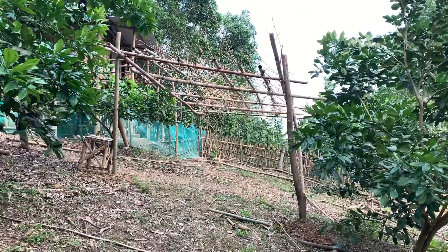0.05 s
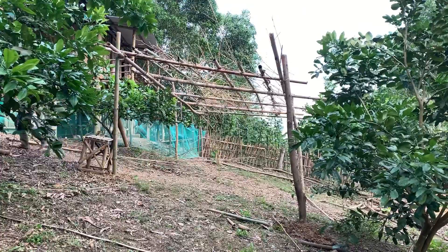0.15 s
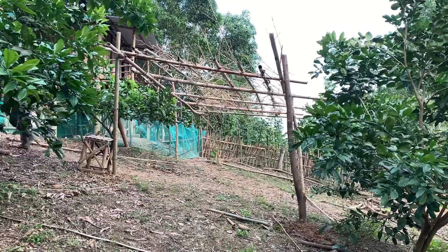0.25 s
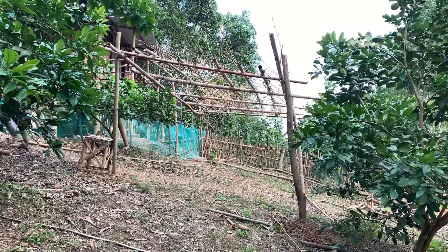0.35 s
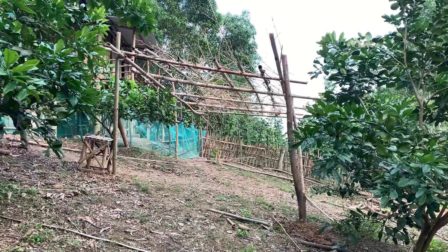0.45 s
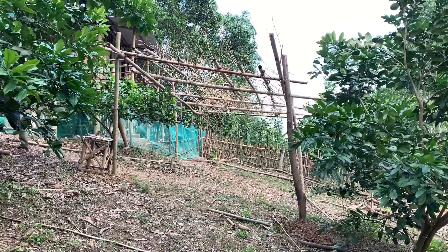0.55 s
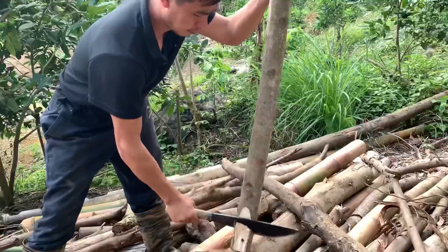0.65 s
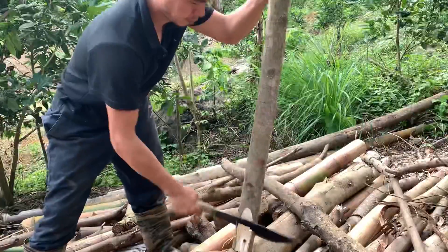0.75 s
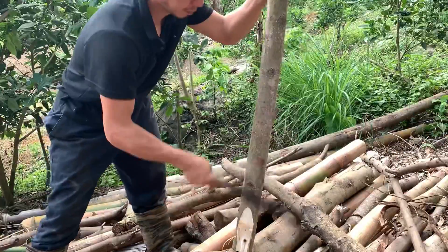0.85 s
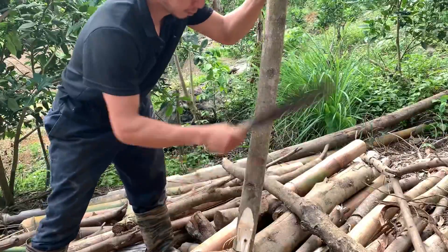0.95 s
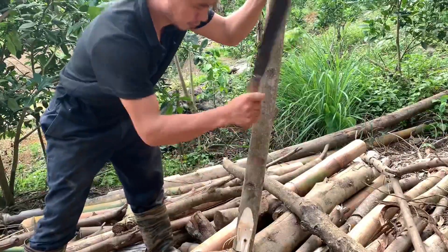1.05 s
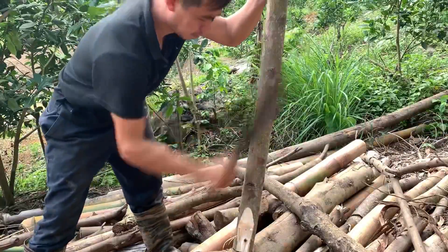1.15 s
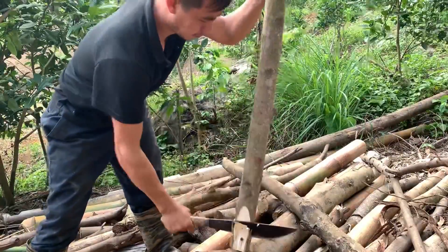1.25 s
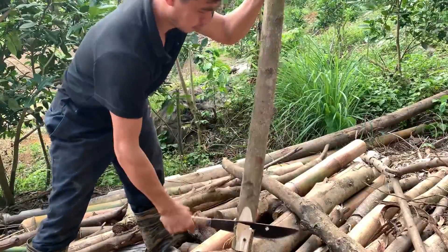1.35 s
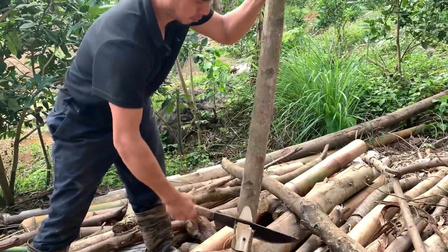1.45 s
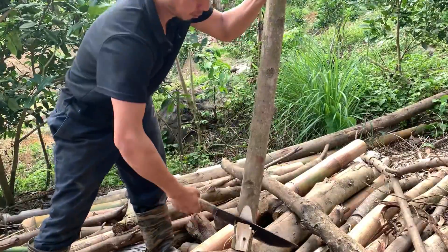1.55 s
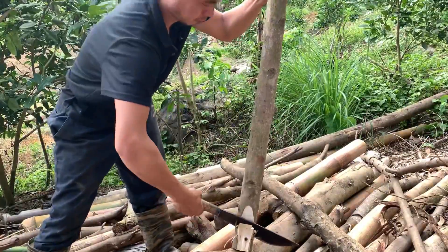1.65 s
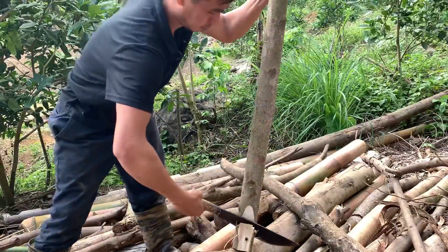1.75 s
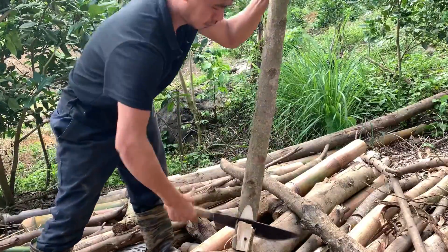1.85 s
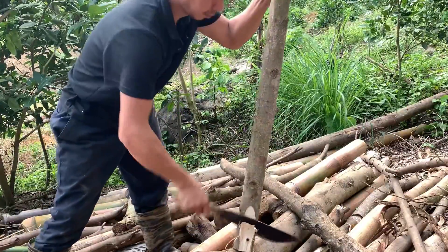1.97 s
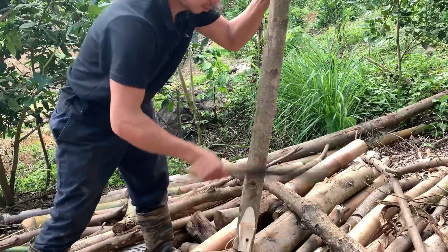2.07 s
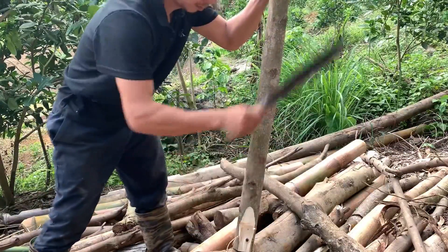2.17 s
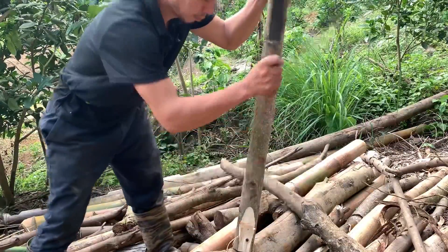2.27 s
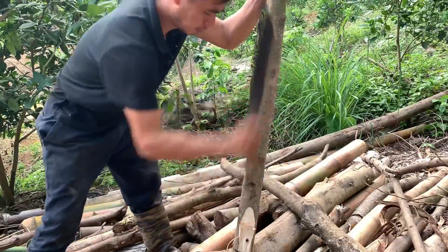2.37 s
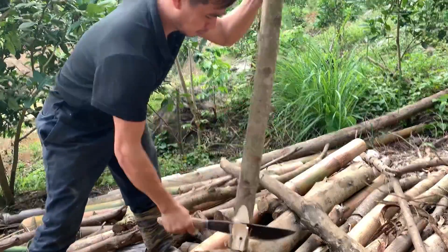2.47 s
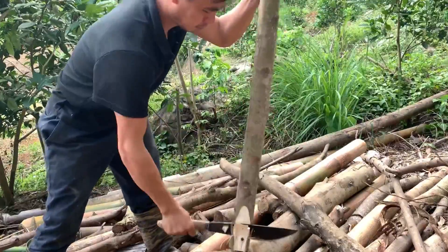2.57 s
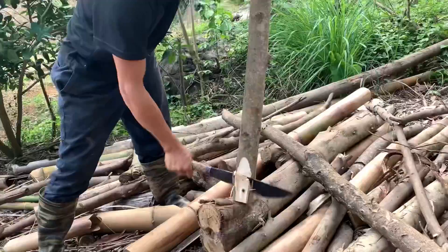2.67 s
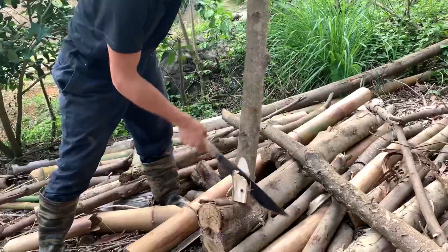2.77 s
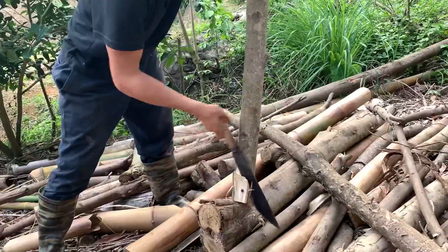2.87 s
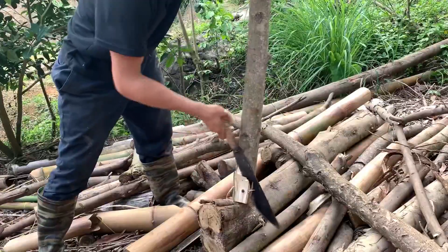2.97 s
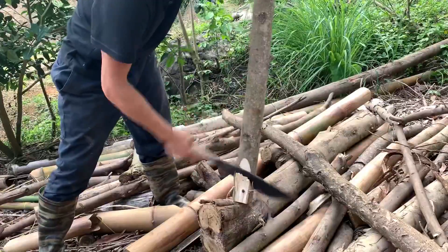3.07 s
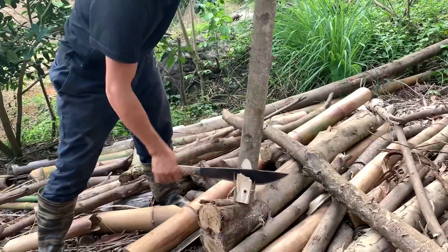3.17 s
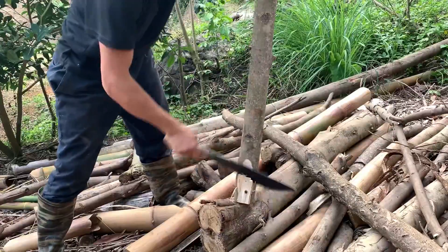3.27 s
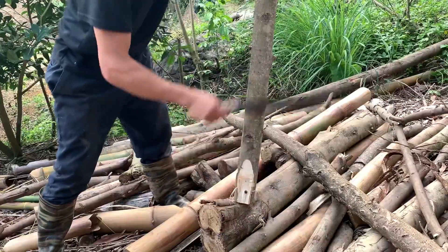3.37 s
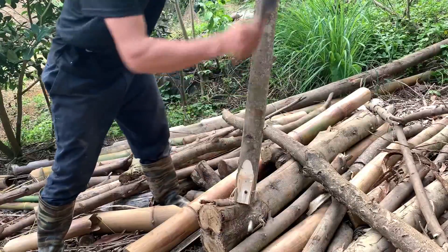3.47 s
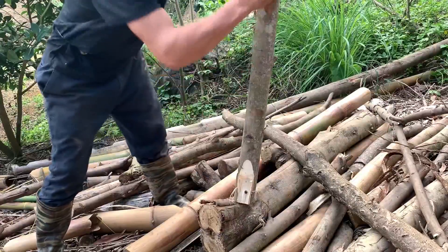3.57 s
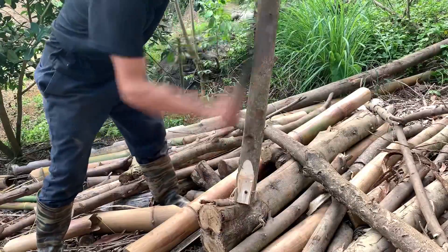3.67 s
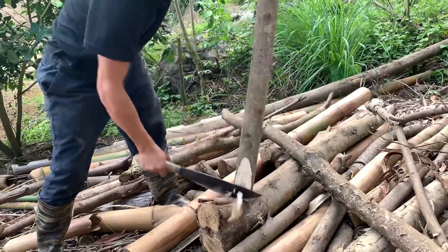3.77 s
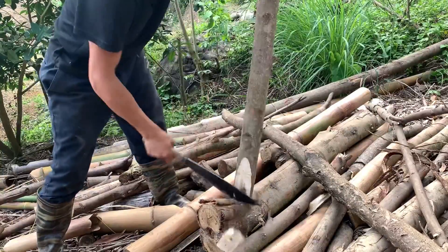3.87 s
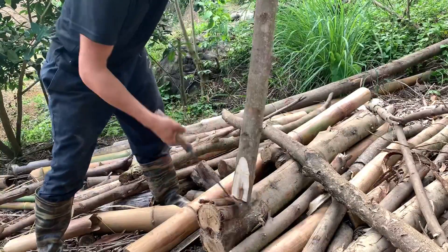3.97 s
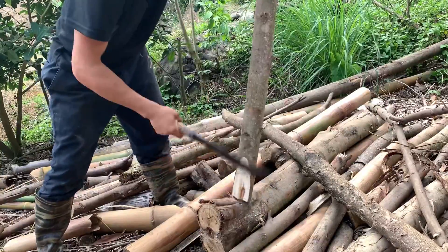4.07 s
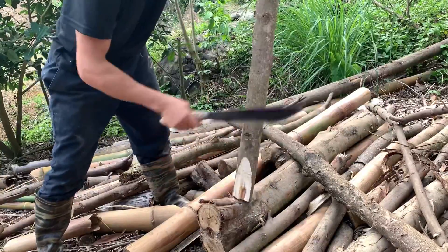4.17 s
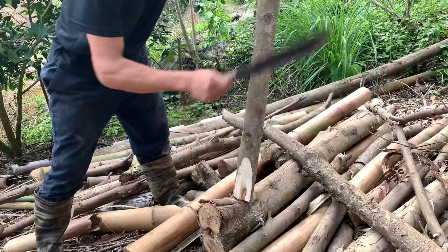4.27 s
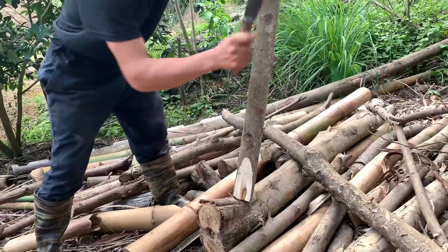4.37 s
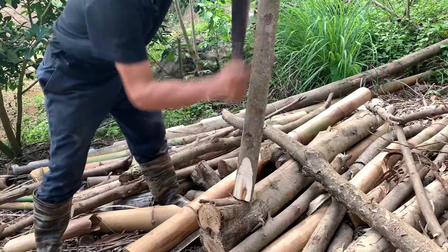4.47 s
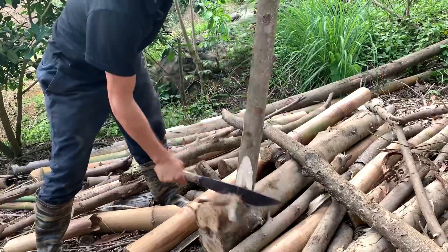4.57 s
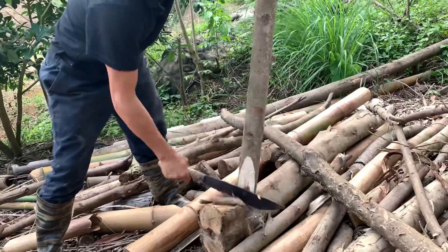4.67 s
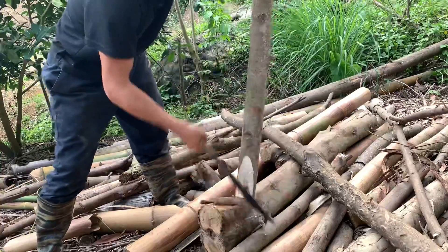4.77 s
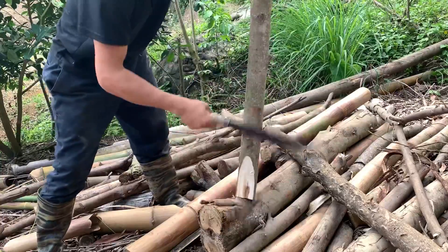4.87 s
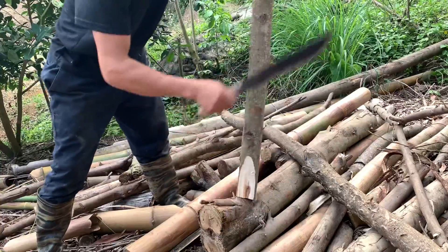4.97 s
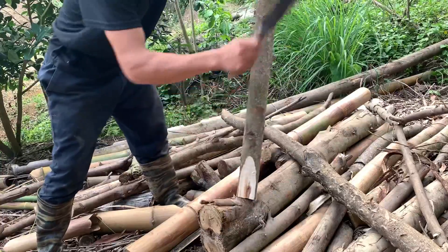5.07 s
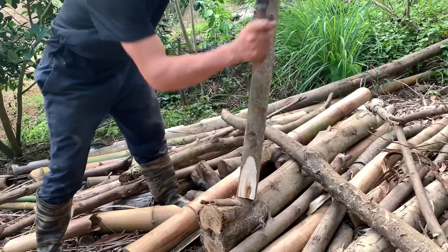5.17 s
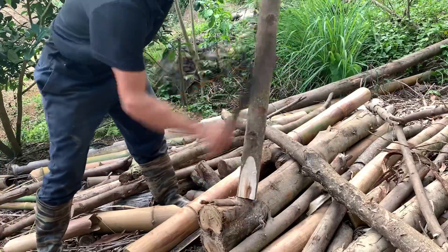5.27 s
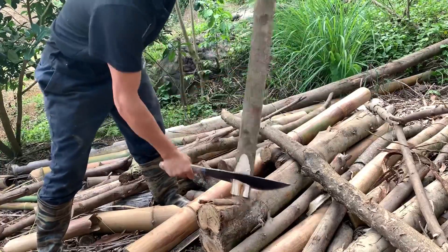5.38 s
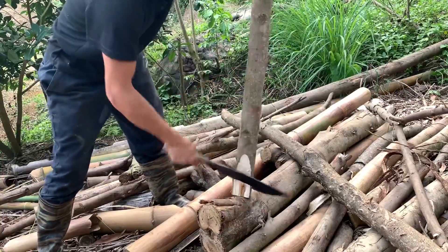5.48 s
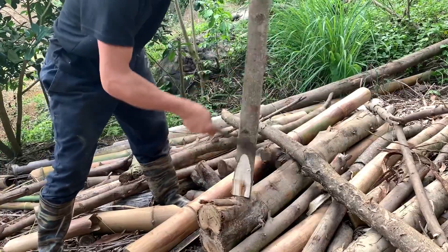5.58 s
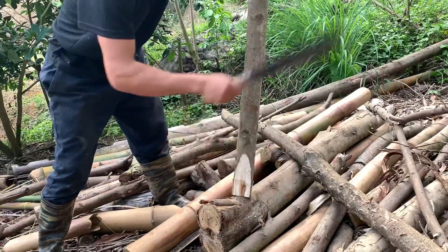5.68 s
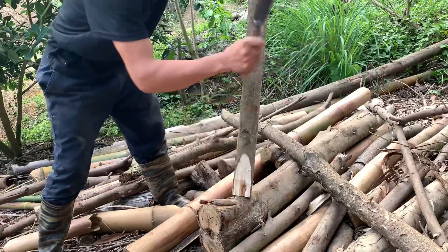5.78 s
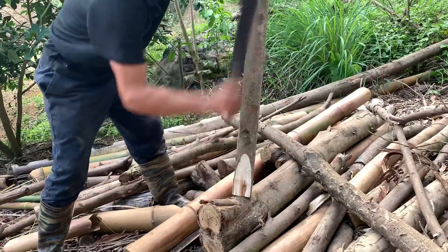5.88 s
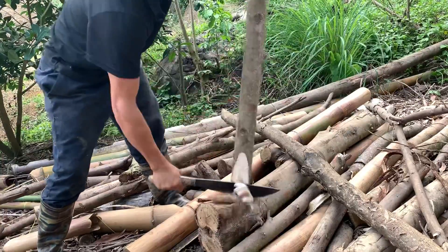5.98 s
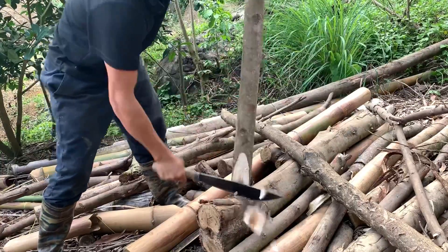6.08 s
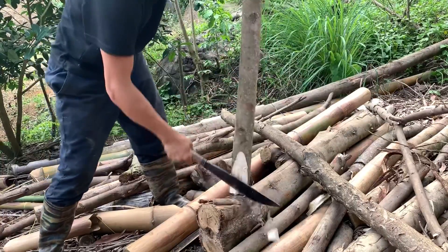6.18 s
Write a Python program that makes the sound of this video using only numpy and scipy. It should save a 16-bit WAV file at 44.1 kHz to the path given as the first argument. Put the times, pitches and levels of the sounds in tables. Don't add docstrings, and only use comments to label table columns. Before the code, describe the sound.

Faint hen clucks over distant insects, then a long blade chops a wooden pole outdoors in hard, cracking, splintering blows while wind rumbles.

```python
import sys
import numpy as np
from scipy import signal
from scipy.fft import rfft, irfft, next_fast_len
from scipy.io import wavfile

SR = 44100
rng = np.random.default_rng(int(sys.argv[2]) if len(sys.argv) > 2 else 0)


def log_audio(samples):
    frames = np.atleast_2d(samples).T
    limited = np.clip(frames, -1, 1)
    pcm = np.round(limited * 32767).astype(np.int16)
    wavfile.write(sys.argv[1], SR, pcm)


def boost_factor(decibels):
    exponent = np.asarray(decibels, float) / 20
    return 10 ** exponent


N = 274743

CUTS_S = (.5885, 2.668)
# [peak t/s, level/dB, top re level/dB, rise/s, decay/s]
TEARS = [(.6245, -13, 8, 0.0084, 0.016), (1.2071, -14, -8, 0.00067, 0.015), (1.212, -10, 6.5, 0.011, 0.01),
         (2.443, -17, 4, 0.0014, 0.037), (2.4505, -15.5, 5.5, 0.031, 0.014), (3.735, -17, 8, 0.0071, 0.025),
         (3.7404, -12, 7, 0.025, 0.028), (3.752, -32, 8, .006, 0.015), (4.5747, -7, 10.5, 0.0019, 0.026),
         (4.5867, -10.5, 3.5, 0.01, 0.022), (4.599, -23, -4, 0.0065, 0.019), (5.3375, -7, 8, 0.0045, 0.018),
         (5.3405, -17, -13, 0.026, 0.0062), (5.9795, -11, 11, 0.0038, 0.03),
         (5.9879, -10, 3, 0.024, 0.0098)]
# [low f/Hz, high f/Hz, level/dB, share of level swing, share of flutter swing]
WIND_BANDS = [(41.2, 109.2, -34.5, 1.006, -0.53), (104.5, 168, -37, 1.18, 0.36),
              (148.6, 246.4, -40, 1.06, 0.62), (233.4, 409, -46.5, 0.91, 0.62)]


def at_hz(points, hz, column=1):
    points = np.array(points)
    return np.interp(np.log(hz), np.log(points[:, 0]), points[:, column])


def in_time(rows):
    s, *columns = np.transpose(rows)
    return [np.interp(np.arange(N) / SR, s, c) for c in columns]


def rms_one(x):
    return x / np.sqrt(np.mean(x ** 2) + 1e-20)


def band(x, low_hz, high_hz, order=2):
    sos = signal.butter(order, [low_hz, min(high_hz, .45 * SR)], "band", fs=SR, output="sos")
    return signal.sosfilt(sos, x)


def drift(rate_hz):
    r = np.exp(-40 * np.pi * rate_hz / SR)
    slow = signal.lfilter([1], [1, -2 * r, r * r], rng.standard_normal(N // 20 + 2002))[2000:]
    return np.interp(np.arange(N) / 20, np.arange(len(slow)), rms_one(slow))


def ring(push, hz, t60_s):
    r, w = boost_factor(-60 / (t60_s * SR)), 2 * np.pi * hz / SR
    return signal.lfilter([0, np.sin(w)], [1, -2 * r * np.cos(w), r * r], push)


def add(out, s, piece):
    i = round(s * SR)
    out[i:i + len(piece)] += piece[:N - i]


def colour(x, gain):
    size = next_fast_len(len(x) + 512)
    hz = np.maximum(np.arange(size // 2 + 1) * SR / size, 1)
    return irfft(rfft(x, size) * gain(hz), size)[:len(x)]


def tears():
    # [f/Hz, level/dB per Hz]
    tear_colour = [(250, -22), (800, 1.5), (2000, -4), (4000, -4), (7000, -11.5), (10000, -10.5),
                   (14000, -5.5), (16000, -19), (17000, -85.5)]
    last_shot_top_db, last_shot_top_hz = -10, 11500
    lead_s = .025
    out, t = np.zeros(N), np.arange(int(.1 * SR)) / SR - lead_s
    for s, tear_db, top_db, rise_s, decay_s in TEARS:
        fibres = rng.standard_normal(len(t)) * boost_factor(2.2 * rng.exponential(1, len(t)))
        swell = np.where(t < 0, boost_factor(60 * t / rise_s), boost_factor(-60 * t / decay_s))
        graze = boost_factor(-24.0 + 1940 * t) * (t < 0) * rms_one(band(fibres, 1460, 9200))

        def shape(hz):
            top = top_db * np.clip(np.log2(hz / 5500) * 1.5, 0, 1)
            shade = last_shot_top_db * (s > CUTS_S[1]) * np.clip(4 * np.log2(hz / last_shot_top_hz), 0, 1)
            return boost_factor(at_hz(tear_colour, hz) + top + shade)
        add(out, s - lead_s, boost_factor(tear_db) * (graze + swell * rms_one(colour(fibres, shape))))
    return out


def blows():
    # [f/Hz, level/dB, t60/s]
    pole_modes = [(171, -36, 0.061), (230, -19, 0.082), (282, 5, 0.26), (347, 4.5, 0.087),
                  (385, -2.5, 0.021), (398.6, -4, 0.26), (487, -16, 0.13), (563, 4.5, 0.16),
                  (655, -1.5, 0.06), (770, -10, 0.091), (831, 6, 0.093), (923, -1, 0.063), (1047, 6, 0.082),
                  (1270, 5, 0.01), (1400, 1, 0.038), (1500, -21.5, 0.038), (1804, 6.5, 0.05),
                  (2020, 4.5, 0.068), (2220, 2.5, 0.014), (2620, -42, 0.0087), (2630, 6, 0.015),
                  (2960, -26, 0.022)]
    # [t/s, level/dB, centre f/Hz, width/octaves, ring factor]
    knocks = [(0.6219, -21.5, 1400, 0.19, 0.46), (.627, -21, 1500, 0.59, 0.86),
              (.630, -22, 490, 0.75, 0.72), (1.2094, -14.5, 1310, 0.54, 0.6),
              (1.215, -10, 1450, 0.99, 0.76), (1.217, -10.5, 795, 0.72, 0.23), (1.216, -17, 280, 1, 0.68),
              (2.443, -35, 1020, 0.84, 0.36), (2.452, -14, 1180, 0.93, 0.24), (2.452, -21.5, 600, 0.6, 1.2),
              (2.452, -17, 290, 0.59, 0.4), (3.735, -5.5, 1500, 0.74, 0.45), (3.744, -14, 700, 0.62, 0.8),
              (4.083, -29.5, 760, 0.12, 0.88), (4.575, -6.5, 1110, 1, 0.62), (4.582, -12, 1300, 0.53, 0.77),
              (4.587, -10.5, 644, 0.55, 0.51), (4.591, -10.5, 398, 0.29, 1.14),
              (5.339, -16, 1220, 0.83, 0.63), (5.339, -16, 690, 0.32, 0.44),
              (5.979, -9.5, 1500, 0.74, 0.78), (5.99, -24, 1000, 0.5, 0.35), (5.986, -16, 1270, 0.5, 1.43),
              (6.018, -19, 303, 0.5, 0.29)]
    shove_at_1khz_s, shove_slope = 0.0023, 0.44
    out, t = np.zeros(N), np.arange(int(.25 * SR)) / SR
    for s, knock_db, centre_hz, width_oct, lasting in knocks:
        shove_s = shove_at_1khz_s * (1000 / centre_hz) ** shove_slope
        shove = rng.standard_normal((len(pole_modes), len(t))) * t * np.exp(-t / shove_s)
        sound = 0
        for push, (hz, mode_db, t60_s) in zip(shove, pole_modes):
            off_centre_db = -8 * (np.log2(hz / centre_hz) / width_oct) ** 2
            below_db = -9 * max(np.log2(centre_hz / hz), 0)
            weight = boost_factor(mode_db + off_centre_db + below_db)
            sound = sound + weight * rms_one(ring(push, hz, t60_s * lasting))
        add(out, s, boost_factor(knock_db) * sound / np.abs(sound).max())
    return out


def cracks():
    # [t/s, peak level/dB, f/Hz, t60/s]
    wood_cracks = [(.6285, -21, 1446, 0.031), (.633, -16.5, 533, 0.023), (.7622, -13.5, 9900, 0.004),
                   (.7751, -14.5, 9800, 0.0038), (1.2145, -5, 1080, .015), (1.2175, -8, 1380, 0.022),
                   (1.2185, -14, 1720, 0.026), (1.231, -23, 200, 0.028), (1.2195, -12.5, 627, 0.027),
                   (1.5961, -13.5, 4130, 0.0066), (1.5961, -11.5, 6320, 0.0035),
                   (1.5995, -26.5, 1350, 0.0096), (1.604, -41, 1040, 0.036), (1.6415, -29, 4100, 0.0073),
                   (2.4477, -1, 4300, 0.004), (2.4525, -13, 1690, 0.02), (2.455, -13.5, 987, 0.029),
                   (2.457, -21, 523, 0.023), (2.463, -26, 230, 0.057), (2.8408, -3.5, 9900, 0.0025),
                   (2.8408, -20, 6850, 0.0081), (2.8408, -32, 3970, 0.015), (2.8435, -34, 1350, 0.018),
                   (3.29, -41, 3860, .015), (3.7365, -3.5, 1450, 0.011), (3.739, -3.5, 2710, 0.011),
                   (3.7435, -11, 904, .02), (3.7525, -26, 917, 0.023), (4.5805, -20, 1030, 0.033),
                   (4.590, -9.5, 608, 0.015), (4.595, -4, 396.7, 0.048), (5.338, -10, 3060, 0.012),
                   (5.3385, -12, 3700, 0.012), (5.3415, -3.5, 680, .021), (5.351, -19, 1010, 0.025),
                   (5.357, -21, 480, 0.042), (5.3425, -8, 1655, 0.016), (5.513, -37, 1325, 0.024),
                   (5.9845, -14, 1420, 0.014), (5.9865, -5, 678, .02), (5.9985, -17, 694, 0.027),
                   (5.9885, -19, 2850, 0.013),
                   (.6238, -11, 10080, .008), (.623, -18, 5040, .008), (.624, -20, 3790, .008),
                   (.6325, -21, 431, .018), (.623, -15, 12660, .007), (.7745, -23, 13500, .005),
                   (.7618, -26, 13000, .005), (1.2115, -7, 4005, .01), (1.2105, -13, 12960, .007),
                   (1.211, -12, 9800, .007), (1.214, -15, 5170, .008), (1.207, -20, 2150, .01),
                   (1.2142, -6, 2400, .005), (1.596, -23, 3140, .008), (1.6415, -24, 10000, .007),
                   (1.5965, -26, 12600, .006), (1.663, -28, 10100, .008), (1.662, -34, 3300, .008),
                   (2.4495, -14, 12900, .007), (2.4495, -17, 10160, .007), (2.4428, -22, 775, .018),
                   (2.4655, -24, 930, .03), (3.741, -10, 3620, .008), (3.741, -10, 6680, .008),
                   (3.7455, -13, 2630, .01), (3.743, -14, 2070, .01), (3.7405, -13, 7450, .006),
                   (3.755, -22, 431, .035), (3.9335, -35, 3660, .01), (4.0818, -29, 2024, .01),
                   (4.0818, -30, 1290, .012), (4.0815, -28, 3620, .008), (4.0815, -32, 4910, .008),
                   (4.0812, -38, 13500, .003), (4.1755, -35, 13500, .003), (4.5755, -14, 3700, .008),
                   (4.5745, -14, 10800, .006), (4.5855, -15, 9730, .007), (4.587, -17, 4740, .008),
                   (4.612, -21, 345, .07), (5.3388, -12, 1464, .012), (5.3365, -10, 9990, .007),
                   (5.337, -11, 8830, .007), (5.3372, -11, 13000, .006), (5.5135, -25, 8100, .007),
                   (5.513, -23, 13300, .006), (5.531, -27, 13780, .006), (5.9878, -10, 1766, .012),
                   (5.982, -11, 6760, .008), (5.9805, -12, 4950, .008), (5.984, -13, 2710, .009),
                   (5.9788, -15, 1077, .014), (5.982, -14, 3440, .008)]
    rise_cycles, choke = 0.94, 1.24
    out, t = np.zeros(N), np.arange(int(.1 * SR)) / SR
    for s, peak_db, hz, t60_s in wood_cracks:
        decay = boost_factor(peak_db - 60 * (t / t60_s) ** choke)
        add(out, s, decay * np.sin(2 * np.pi * hz * t) * np.clip(t * hz / rise_cycles, 0, 1))
    return out


def snaps():
    # [t/s, peak level/dB, centre f/Hz, width/octaves]
    splinters = [(0.7486, -37, 10300, 0.38), (0.7624, -29, 9800, 0.22), (0.775, -23, 10800, 0.95),
                 (1.2125, -15, 3900, 0.22), (1.499, -37, 13000, 0.42), (1.535, -32, 11900, 0.23),
                 (1.5954, -17, 10500, 0.27), (1.612, -32, 10400, 0.6), (1.6408, -25, 9900, 1.2),
                 (1.6583, -30, 13000, 0.5), (1.662, -26.5, 9500, 1.3), (1.69, -33.5, 11000, 1.5),
                 (2.3064, -45, 6960, 1.2), (2.4469, -15, 4100, 0.33), (2.7424, -39, 10200, 0.37),
                 (2.841, -14.5, 9600, 0.6), (4.8355, -38, 11200, 0.36), (5.1615, -36.5, 10500, 0.67),
                 (5.5132, -19, 10100, 0.89), (5.5309, -24.5, 8740, 0.47), (2.806, -37, 11500, 0.49),
                 (3.938, -38, 13800, 0.6)]
    # [t/s, peak level/dB, centre f/Hz, dull part re bright/dB, t60/s]
    chips = [(1.596, -15, 4400, -22, 0.0057), (3.1421, -37, 3100, -17, 0.023),
             (3.2883, -56, 3900, -24, 0.027), (3.931, -40.5, 3400, -0.5, 0.063),
             (4.0807, -33, 3580, 4, 0.021), (4.175, -38, 3900, -9, 0.018),
             (4.733, -45.5, 1980, -0.5, 0.091), (6.174, -53, 2500, 18, 0.042)]
    splinter_t60_s, splinter_dull_db, dull_late_s, chip_octaves = 0.018, -18, .003, 0.66
    out, t = np.zeros(N), np.arange(int(.06 * SR)) / SR
    rows = [(*row, splinter_dull_db, splinter_t60_s) for row in splinters]
    rows += [(s, db, hz, chip_octaves, dull_db, t60_s) for s, db, hz, dull_db, t60_s in chips]
    for s, peak_db, centre_hz, octaves, dull_db, t60_s in rows:
        bright, dull = rng.standard_normal((2, len(t))) * boost_factor(2.33 * rng.exponential(1, len(t)))

        def peak(hz):
            skirt_db = -8 * np.abs(np.log2(hz / centre_hz)) / octaves
            return boost_factor(skirt_db - 9.0 * np.maximum(np.log2(2500 / hz), 0) - 40 * (hz > 16500))
        tick = boost_factor(dull_db) * rms_one(band(dull, 523, 2400)) * np.clip(t / dull_late_s, 0, 1) ** 2
        sound = rms_one(colour(bright, peak)) + tick
        attack = np.clip(t / .0004, 0, 1)
        add(out, s, boost_factor(peak_db) * sound * attack * boost_factor(-60 * t / np.clip(t60_s, .004, .1)))
    return band(out, 740, 16800, order=2)


def blade():
    # [t/s, level of each steel mode/dB x3]
    grazes = [(0.822, -46, -43, -48), (3.28, -46.5, -76, -64), (5.70, -64, -64, -53),
              (6.178, -41, -77, -77)]
    # [f/Hz, t60/s]
    steel_modes = [(7868, 0.2), (9660, 0.18), (13210, 0.16)]
    out, t = np.zeros(N), np.arange(int(.25 * SR)) / SR
    for s, *levels_db in grazes:
        for (hz, t60_s), level_db in zip(steel_modes, levels_db):
            envelope = (1 - np.exp(-t / 0.0011)) * boost_factor(-60 * t / t60_s)
            add(out, s, boost_factor(level_db) * np.sin(2 * np.pi * hz * t) * envelope)
    return out


def bounces(x):
    # [delay/s, level/dB]
    log_bounces = [(.00045, -16), (.0011, -17.5), (.0019, -15)]
    out = np.zeros(N)
    for late_s, level_db in log_bounces:
        add(out, late_s, boost_factor(level_db) * x)
    return band(out, 330, 9000)


def trees(x):
    # [f/Hz, level/dB, t60/s]
    echo = [(393, -44, 0.21), (1500, -32.5, 0.1), (4950, -40, 0.15), (14000, -52.5, 0.17)]
    t, octave_hz = np.arange(int(.4 * SR)) / SR, 240 * 2. ** np.arange(7)
    noise, answer = rng.standard_normal((2, len(t))), 0
    for low_hz in octave_hz[:-1]:
        hz = low_hz * np.sqrt(2)
        gain = boost_factor(at_hz(echo, hz) - 60 * t / at_hz(echo, hz, column=2))
        answer = answer + band(noise, low_hz, 2 * low_hz) * gain * np.clip(t / 0.0012, 0, 1)
    return signal.fftconvolve(x[None], spread(answer), axes=1)[:, :N]


def hen():
    # [t/s, length/s, start f/Hz, level/dB, creak depth 0-1]
    clucks = [(.13, 0.038, 495, -56, 0.12), (.235, 0.027, 560, -50.5, 0.23), (.335, .04, 666, -58.5, 0.25),
              (.355, 0.025, 540, -48.5, 0.63), (.435, 0.046, 597, -55.5, 0.62),
              (.45, 0.051, 479, -53.5, 0.42), (.51, 0.051, 428, -49, 0.15), (.565, 0.014, 466, -53, 0.65),
              (.578, .014, 380, -54, .9), (.45, .035, 715, -60, .3), (.35, .04, 335, -59, .3)]
    creak_cycles, creak_sag_hz, arch_hz = 3.5, 91, 60
    out, waver = np.zeros(N), drift(80)
    for s, length_s, hz, level_db, creak in clucks:
        u = np.linspace(0, 1, int(length_s * SR))
        glide_hz = hz - creak_sag_hz * creak * u + arch_hz * (1 - creak) * np.sin(2.0 * u)
        phase = 2 * np.pi * np.cumsum(glide_hz * (1 + 0.023 * waver[:len(u)])) / SR
        throb = 1 + creak * np.cos(phase / creak_cycles)
        note = (np.sin(phase) + 0.079 * np.sin(2 * phase)) * throb
        add(out, s, boost_factor(level_db) * note * np.sin(np.pi * u) ** .5)
    return out


def floor_db(levels_db, duck_db):
    duck_s = 0.072
    t = np.arange(N) / SR
    since = [np.maximum(t - s, 0) / duck_s for s, *_ in TEARS]
    sink = sum(boost_factor(row[1]) * u * np.exp(1 - u) for row, u in zip(TEARS, since))
    return np.where(t < CUTS_S[0], *levels_db) + duck_db * sink


def orchard(patchy_db):
    # [f/Hz, level/dB per Hz]
    air_colour = [(250, -30), (500, -2), (800, -8), (1500, -9), (3000, -9), (4400, -8.5), (5400, -12.5),
                  (7500, -10.5), (10000, -14), (13000, -14), (15500, -17)]
    # [t/s, level/dB]
    leaf_level = [(0, -64), (.585, -65), (.6, -54.5), (1.0, -58), (1.35, -54), (1.9, -54.5), (2.1, -56),
                  (3.6, -55), (3.8, -55), (3.85, -60), (3.9, -55.5), (4.15, -55.5), (4.27, -51.5),
                  (4.33, -56.5), (4.42, -53), (4.55, -53.5), (5.05, -56.5), (5.5, -54), (6.23, -55.5)]
    # [first shot level/dB, later shots level/dB]
    insect_level_db = (-61, -64.5)
    hiss_db = in_time(leaf_level)[0] + floor_db((0, 0), duck_db=-1.5)
    insect_db = floor_db(insect_level_db, duck_db=-3)
    leaves, third_hz = 0, 240 * 2 ** np.arange(0, 6.4, 1 / 3)
    white = rng.standard_normal((2, 2, N))
    for k, (low_hz, high_hz) in enumerate(zip(third_hz, third_hz[1:])):
        gain = boost_factor(at_hz(air_colour, np.sqrt(low_hz * high_hz)) + patchy_db * drift(2.1))
        leaves = leaves + gain * band(white[k % 2], low_hz, high_hz)
    leaves = signal.sosfilt(signal.cheby2(16, 50, 16100, fs=SR, output="sos"), leaves)
    leaves = leaves / np.std(band(leaves, 490, 9900))
    insects = rms_one(band(rng.standard_normal((2, N)), 6260, 7190))
    insects += boost_factor(-8.5) * rms_one(band(rng.standard_normal((2, N)), 4150, 4600))
    return spread(boost_factor(hiss_db) * leaves + boost_factor(insect_db) * insects)


def gusts():
    # [t/s, level/dB, flutter re rumble/dB]
    steady_wind = [(0, -51, -1), (.1, -61.5, -7), (.56, -49.5, -1), (.64, -38, -5.5), (1.0, -52.5, -2),
                   (1.1, -34.5, -9.5), (1.5, -42, -12), (2.25, -41, -12.5), (2.83, -41.5, 1.5),
                   (3.1, -36, -8), (3.38, -26, -5), (3.68, -24, 2), (3.83, -40.5, 16), (4.0, -28.5, -2),
                   (4.68, -31, -6), (5.2, -24, -0.5), (5.83, -25.5, 3.5), (6.23, -27, 3)]
    # [t/s, peak level/dB, flutter re rumble/dB,
    # length/s]
    gust_events = [(0.662, -32.5, -3.5, 0.13), (0.906, -38, -9, 0.049), (1.055, -36.5, -25, 0.061),
                   (1.22, -34, 14, 0.1), (1.32, -33.5, -2.5, 0.088), (1.555, -30, -5.5, 0.069),
                   (1.727, -39.5, -9, 0.18), (1.839, -32, -6, 0.044), (1.943, -37.5, -19, 0.044),
                   (2.107, -38.5, -9, 0.35), (2.231, -40, 10, 0.025), (2.469, -39.5, 26, 0.088),
                   (2.576, -28, -2, 0.048), (2.84, -30, -10, 0.05), (3.025, -23.5, -9, 0.065),
                   (3.192, -21.5, -1.5, 0.12), (3.426, -18.5, -1.5, 0.058), (3.625, -23, -4, 0.029),
                   (3.93, -22, -12, 0.045), (4.06, -29, -8, 0.038), (4.159, -29, -21, 0.052),
                   (4.278, -21.5, 7.5, 0.028), (4.52, -26, 1, 0.5), (4.803, -25.5, 1, 0.14),
                   (4.919, -21.5, 4, 0.017), (5.096, -22, 6.5, 0.1), (5.447, -19.5, -6, 0.045),
                   (5.64, -21, 0.5, 0.12), (5.91, -25, 6, 0.19), (6.181, -21.5, -3, 0.031)]
    rise_share, fall_share = 0.24, 0.31
    band_db, follows, tilts = np.transpose(WIND_BANDS)[2:, :, None]

    def power_of(level_db, tilt_db):
        return boost_factor(band_db + follows * (level_db + 30) + tilts * tilt_db) ** 2
    power, t = power_of(*in_time(steady_wind)), np.arange(N) / SR
    for s, peak_db, tilt_db, length_s in gust_events:
        near = slice(int((s - .2) * SR), int((s + .2) * SR))
        late = (t[near] - s) / length_s
        swell = np.exp(-(late / np.where(late < 0, rise_share, fall_share)) ** 2)
        power[:, near] += power_of(peak_db, tilt_db) * swell
    return np.sqrt(power)


def wind(lump_db, shared):
    # [t/s, peak level/dB]
    puffs = [(3.011, -35.5), (3.153, -25.5), (3.189, -25.5), (3.198, -20), (3.285, -32), (3.39, -25.5),
             (3.419, -22.5), (3.458, -29.5), (3.682, -54), (3.926, -46), (4.269, -29.5), (4.523, -55),
             (5.058, -52), (5.069, -17), (5.246, -27), (5.583, -52), (5.748, -21.5), (5.871, -41),
             (3.627, -31), (3.836, -43), (3.974, -38), (4.02, -37.5), (4.361, -36.5), (4.4, -42),
             (4.915, -34), (4.976, -36.5), (5.309, -36), (5.441, -27), (5.625, -30), (5.799, -33),
             (1.828, -43), (2.565, -41), (2.702, -36.5)]
    eddies, out = drift(16.4), 0
    for (low_hz, high_hz, *_), gain in zip(WIND_BANDS, gusts()):
        flutter = np.minimum(shared * eddies + 1.05 * drift(40.0), 1.5)
        lumps = boost_factor(lump_db * flutter * np.sqrt(low_hz / 110))
        out = out + gain * rms_one(lumps * band(rng.standard_normal(N), low_hz, high_hz, order=3))
    t = np.arange(int(.06 * SR)) / SR
    for s, peak_db in puffs:
        turns = np.cumsum(110 + 600 * np.exp(-t / 0.00615)) / SR + rng.random()
        envelope = np.clip(t / 0.0077, 0, 1) * np.exp(-t / 0.011)
        add(out, s - .002, boost_factor(peak_db + 6.0) * np.sin(2 * np.pi * turns) * envelope)
    return band(out, 47.7, 740, order=4)


def crosswind():
    # [t/s, level/dB]
    cross_level = [(0, -77), (4.9, -75), (5.08, -44), (5.25, -62), (5.5, -49), (5.7, -51), (5.8, -46),
                   (5.95, -45), (6.1, -40), (6.23, -45)]
    lumps = boost_factor(7.3 * drift(16))
    return boost_factor(*in_time(cross_level)) * rms_one(lumps * band(rng.standard_normal(N), 130, 530, order=3))


def spread(pair):
    # [f/Hz, shared part 0-1]
    likeness = [(250, .6), (700, .3), (1400, 0), (6000, .1), (8600, .3), (9500, .995), (16000, .995)]
    return np.array([colour(x, lambda hz: np.sqrt(1 + sign * at_hz(likeness, hz)))
                     for x, sign in zip(pair, (1, -1))])


def ports(shared, apart, pan_db):
    # [f/Hz, left lag/turns, left re
    # right/dB]
    port_gap = [(250, 0, 0), (550, 0, -2), (950, .01, -3), (1500, .03, -1), (2500, -.08, 0),
                (3600, -.06, .5), (5000, -.03, -3), (7000, -.04, -2.5), (8700, -.3, 0), (10130, 0, 0),
                (11500, .46, 0), (12050, .54, 0), (13400, 1, 0), (15050, 1.5, 0), (16700, 2, 0)]

    def port(sign):
        def gain(hz):
            level = boost_factor(-sign * at_hz(port_gap, hz, column=2) / 2)
            return level * np.exp(sign * 1j * np.pi * at_hz(port_gap, hz))
        return colour(shared, gain)
    left, right = port(-1), port(1)
    return np.array([(left + apart) * boost_factor(pan_db / 2), (right - apart) * boost_factor(-pan_db / 2)])


def cuts():
    fade_in_s = .016
    t = np.arange(N) / SR
    return np.prod([np.where(t < s, 1, np.clip((t - s) / fade_in_s, 0, 1)) for s in CUTS_S], axis=0)


def fold(pair):
    # [t/s, f/Hz]
    fold_edge = [(0, 250), (.58, 230), (.65, 340), (2.4, 335), (2.5, 220), (2.66, 220), (2.7, 550),
                 (4.95, 540), (5.1, 325), (5.7, 274), (5.8, 142), (6.23, 140)]
    mid, side = pair.mean(axis=0), (pair[0] - pair[1]) / 2
    grid_hz = 130 * 2 ** np.arange(0, 2.6, .5)
    edge_hz = np.clip(*in_time(fold_edge), grid_hz[0], grid_hz[-1])
    place, kept = 2 * np.log2(edge_hz / grid_hz[0]), 0
    for k, hz in enumerate(grid_hz):
        high = signal.sosfiltfilt(signal.butter(7, hz, "high", fs=SR, output="sos"), side)
        kept = kept + np.clip(1 - np.abs(place - k), 0, 1) * high
    return np.array([mid + kept, mid - kept])


def scene():
    near, rings, far = tears() + blows() + snaps() + blade(), cracks(), hen()
    shared, apart = trees(1.26 * near + 0.46 * rings + 4.0 * far) + orchard(patchy_db=1.1)
    centre = wind(lump_db=4.0, shared=0.53)
    near = near + rings
    apart = apart + 0.11 * far + bounces(near) + crosswind()
    return cuts() * (ports(near + far + shared, apart, pan_db=0.36) + centre)


def top_cut(x):
    return signal.sosfilt(signal.butter(12, 17030, fs=SR, output="sos"), x)


def record(dry):
    rounded = .84 * np.tanh(fold(dry) / .84)
    rounded = signal.sosfilt(signal.cheby2(10, 60, 17000, fs=SR, output="sos"), rounded)
    return top_cut(rounded)


dry = scene()
out = record(dry)
log_audio(out)
```